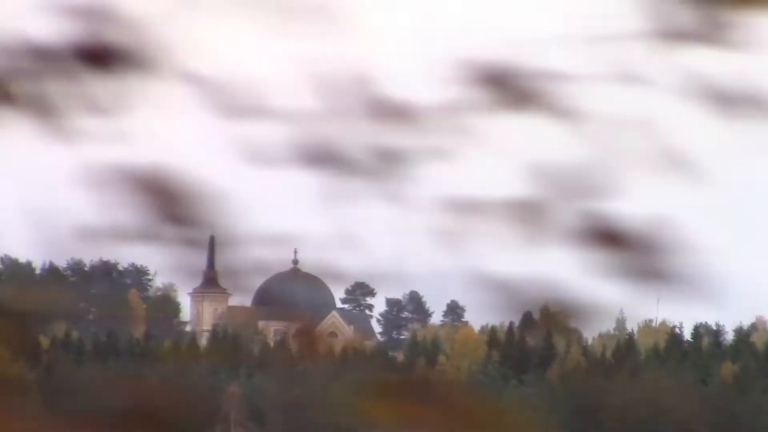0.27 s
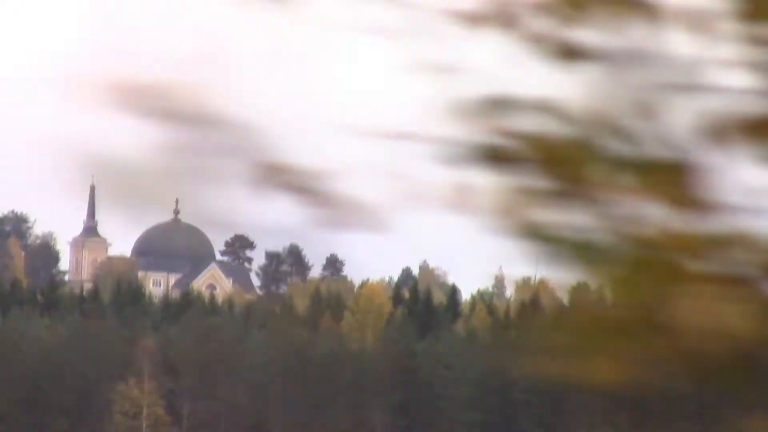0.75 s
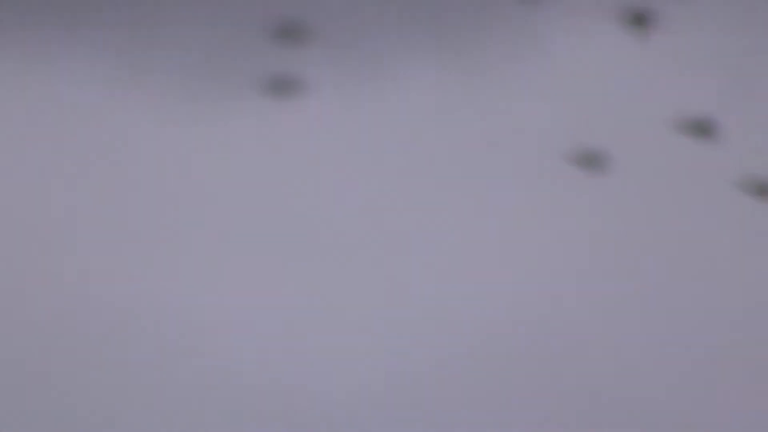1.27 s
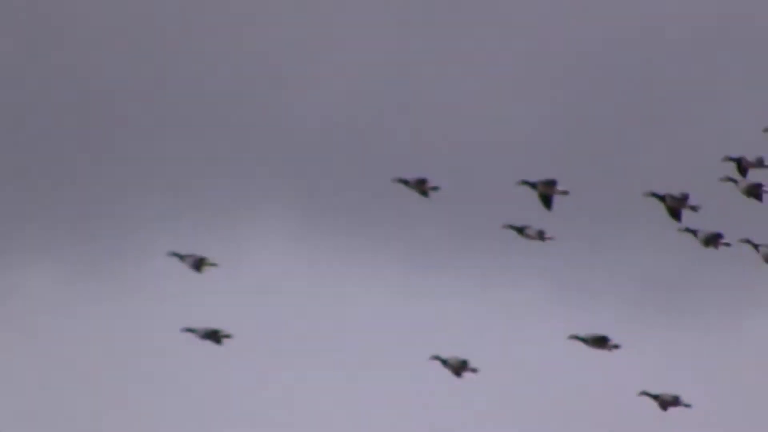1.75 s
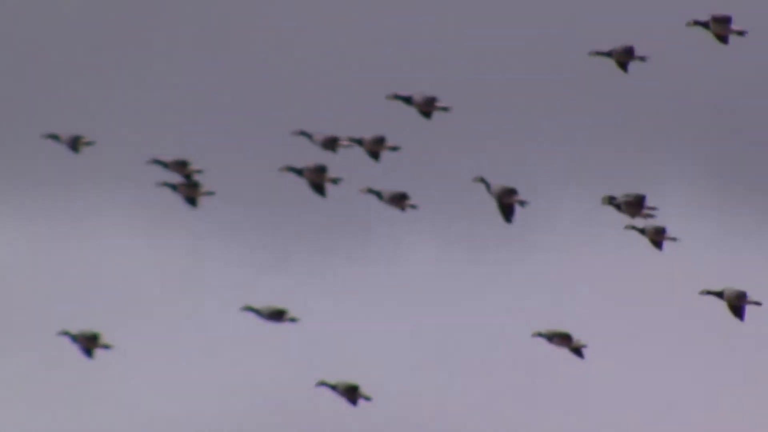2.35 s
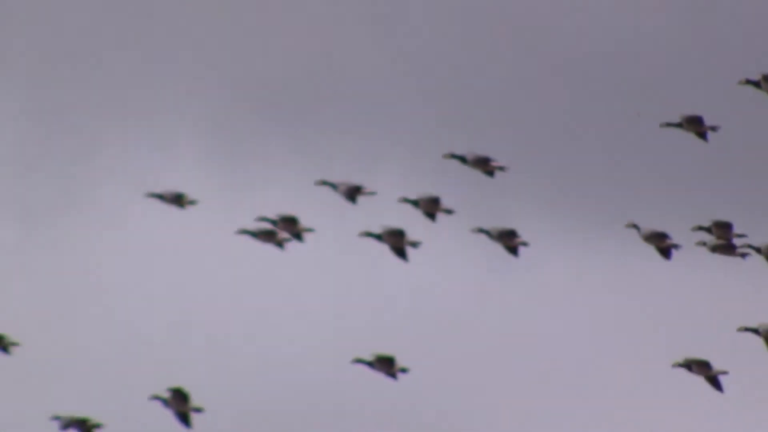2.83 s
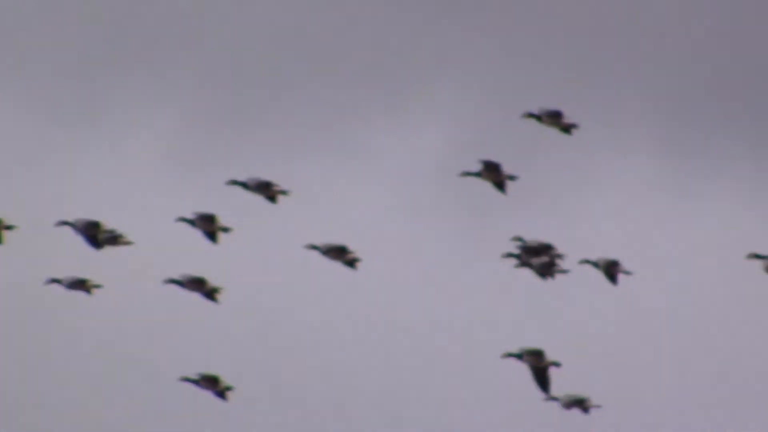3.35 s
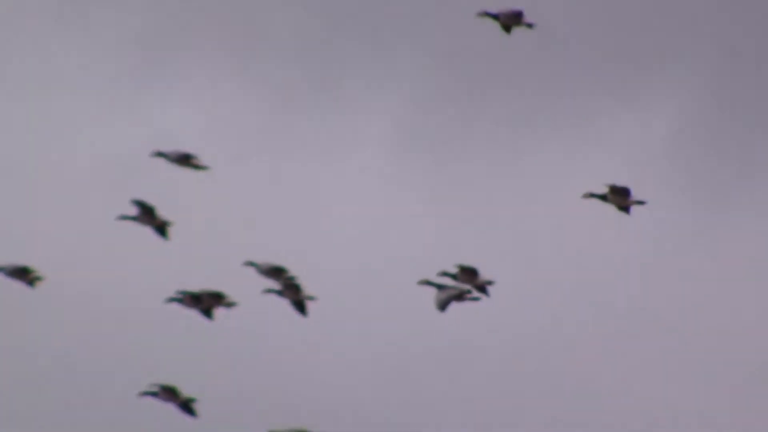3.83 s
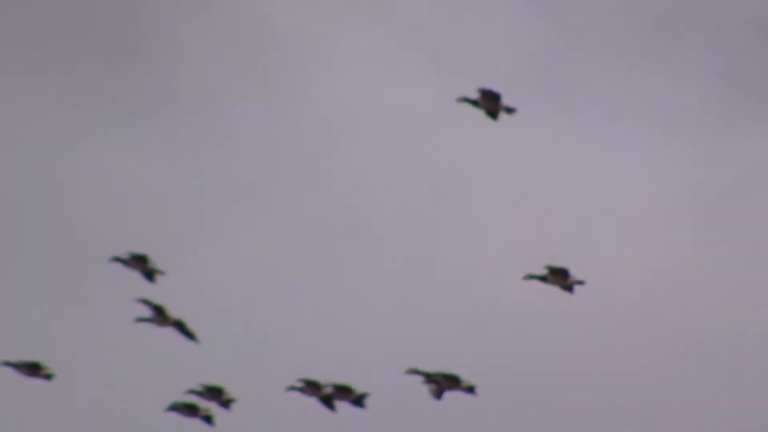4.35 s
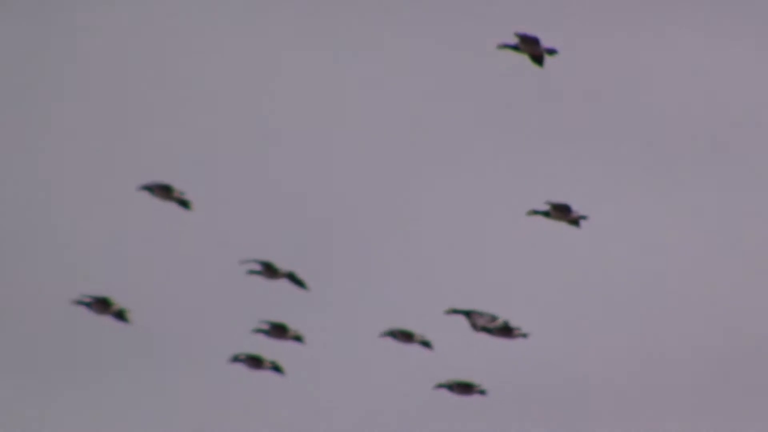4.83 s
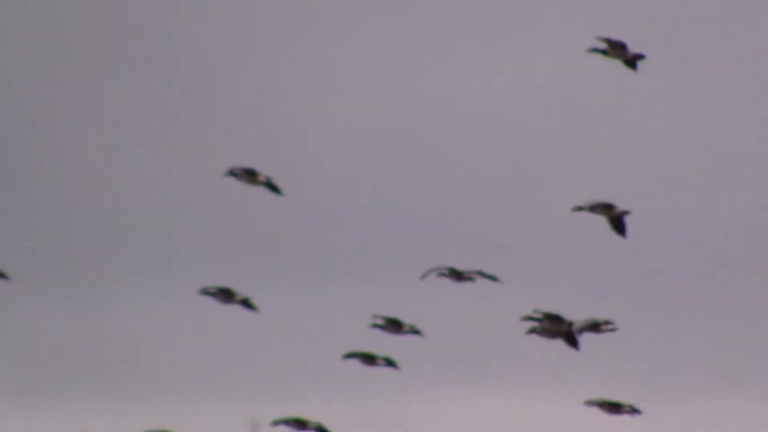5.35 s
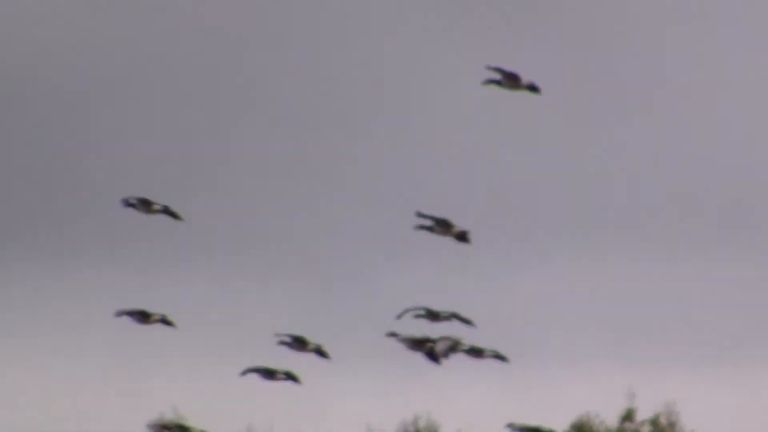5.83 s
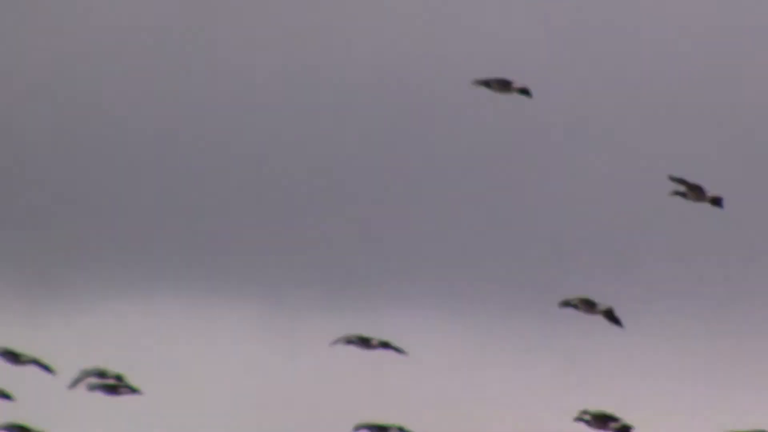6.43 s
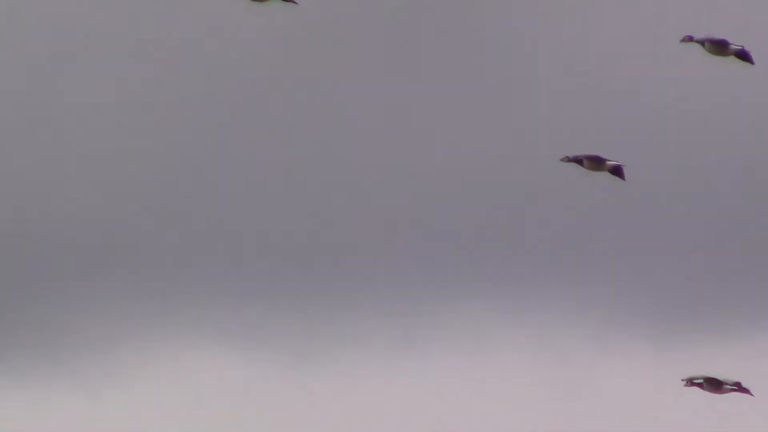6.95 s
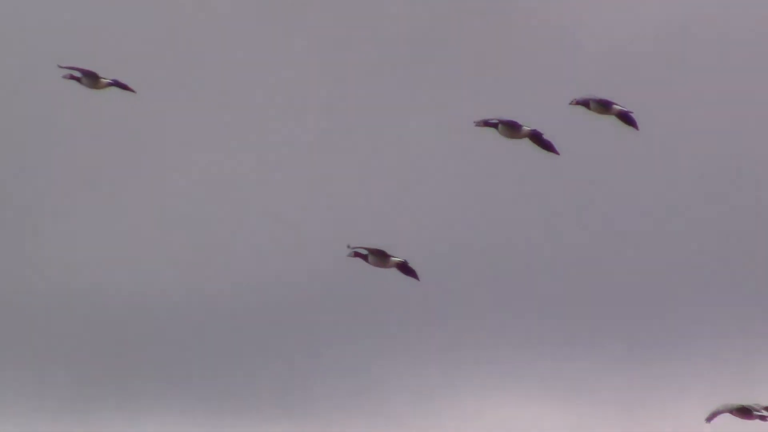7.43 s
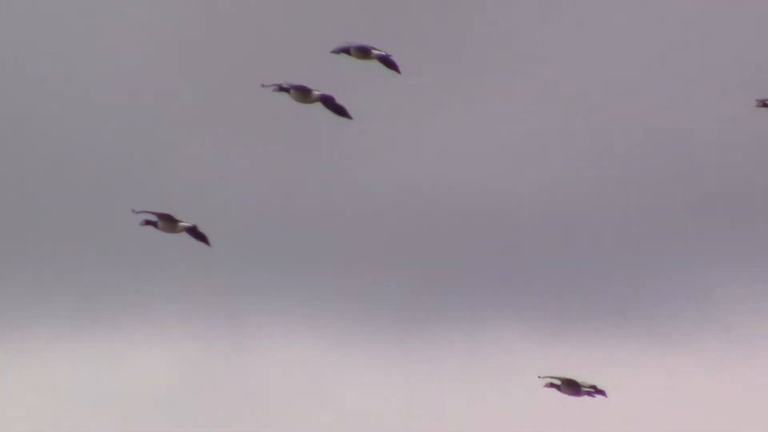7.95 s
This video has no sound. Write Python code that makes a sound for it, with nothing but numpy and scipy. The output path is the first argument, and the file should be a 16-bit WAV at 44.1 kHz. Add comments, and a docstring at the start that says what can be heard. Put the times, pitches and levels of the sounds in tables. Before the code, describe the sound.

First close, rough foliage noise with crackling twigs and handling thumps on the camera microphone. After an abrupt, near-silent break, many geese call together outdoors, blending into continuous high-pitched gabble. Individual nearer honks and yelps poke through, with soft low grunts, a quiet murmur of air and hiss underneath, and a small camera click later on. The calling continues to the end.

```python
"""Open field with a tree line: a hand-held camera brushes through bushes, then a flock of geese yaps.
Leaves and twigs are shaped noise; knocks are damped body modes over a rumble. After a near-silent gap,
near geese sing as sums of overtones, and hundreds of others blur into a chatter of filtered membrane
pulses that the tree line throws back as a decaying tail. Low grunts, a steady murmur and a few small
clicks of the camera body lie with them."""
import sys
import numpy as np
from scipy import signal
from scipy.fft import rfft, irfft, next_fast_len
from scipy.io import wavfile
from scipy.ndimage import uniform_filter1d, map_coordinates

SR = 44100
rng = np.random.default_rng(int(sys.argv[2]) if len(sys.argv) > 2 else 0)


def write(x):
    x = np.atleast_2d(x).T
    wavfile.write(sys.argv[1], SR, np.round(np.clip(x, -1, 1) * 32767).astype(np.int16))

N = 361179  # length in samples

# Transmission of windpipe and bill: f/Hz, gain/dB
VOCAL_TRACT = [(80, -62), (300, -42), (640, -23.5), (850, -9.5), (1050, -11.5), (1350, -2.5), (1550, -13),
               (1880, 0.5), (2350, -10), (3200, -20), (4500, -28), (6200, -28.5), (9000, -47.5),
               (15000, -71)]
CUT, RESUME = .8015, .833  # s: the bushes drop away, the geese start


def near_geese():
    """Additive synthesis: harmonics of an arched pitch, weighted by the resonances of windpipe and bill."""
    # Near calls: t/s, length/s, top pitch f/Hz, place of the pitch crest (share of the call),
    # nominal level of the favoured overtone/dB, open bill favours f/Hz, shrillness/dB
    yaps = [(0.851, 0.091, 895, 0.39, -39, 1840, 12), (0.95, 0.1, 809, 0.2, -48, 1650, 5),
            (1.075, 0.066, 501, 0.36, -31.5, 1970, 2), (1.132, 0.082, 441, 0.6, -46, 1760, 13.5),
            (1.226, 0.12, 870, 0.25, -32.5, 1790, -10), (1.254, 0.105, 334.7, 0.41, -42, 2390, -1),
            (1.527, 0.12, 474, 0.43, -54, 3180, -2.5), (1.705, 0.086, 439, 0.37, -32.5, 1825, -6),
            (1.901, 0.11, 459, 0.56, -38, 2300, 2.5), (1.994, 0.062, 820, 0.35, -44, 2450, -8),
            (2.123, 0.061, 432, 0.37, -36.5, 1750, 4.5), (2.207, 0.048, 1042, 0.44, -37.5, 2080, -6),
            (2.275, 0.22, 447.5, 0.48, -46, 2240.0, 4), (2.401, 0.19, 968, 0.72, -37.5, 1970, 6),
            (2.465, 0.059, 873, 0.23, -40.5, 2630, 1), (2.73, 0.091, 401, 0.52, -40.5, 2000, -2),
            (2.785, 0.06, 827, 0.47, -48, 2520, -6), (2.825, 0.073, 1020, 0.088, -51, 3060, -6),
            (3.025, 0.063, 662, 0.2, -35.5, 1330, -7), (3.069, 0.032, 897, 0.36, -46, 1850, 17),
            (3.163, 0.16, 818, 0.4, -41, 1660, 2.5), (3.269, 0.042, 960, 0.53, -31, 1920.0, 6.5),
            (3.41, 0.088, 1260, 0.59, -44.5, 1260, 12), (3.436, 0.084, 465, 0.35, -36, 1880.0, 9),
            (3.494, 0.16, 877, 0.85, -38.5, 1770, 0), (3.709, 0.1, 421, 0.6, -44, 2540, 2),
            (3.855, 0.1, 421, 0.1, -40, 2050, -10), (3.935, 0.045, 960, 0.27, -30.5, 1900.0, 5.5),
            (4.073, 0.061, 963, 0.48, -37, 1920, 10), (4.116, 0.051, 874, 0.47, -31.5, 1760, 3),
            (4.169, 0.085, 898, 0.5, -31, 1720, 1), (4.394, 0.12, 458, 0.35, -39.5, 1800, 1),
            (4.42, 0.053, 430, 0.38, -37, 1710.0, 2), (4.666, 0.068, 335.4, 0.65, -40, 1690, -1),
            (4.765, 0.079, 473, 0.18, -36, 1870.0, 2), (4.861, 0.055, 927, 0.79, -30.5, 1780, -9),
            (5.07, 0.043, 875, 0.43, -31.5, 1670, 1), (5.543, 0.051, 878, 0.32, -28.5, 1640, 0),
            (5.698, 0.067, 904, 0.97, -43, 1820, -9), (5.896, 0.048, 970, 0.15, -28.5, 1880, -7),
            (5.958, 0.33, 904, 0.084, -41, 1800, -6), (6.389, 0.13, 835, 0.55, -36.5, 1640, -6),
            (6.538, 0.27, 934, 0.12, -39.5, 1840, -1), (6.76, 0.051, 893, 0.63, -45, 1780, -4),
            (6.916, 0.064, 450, 0.7, -43, 2260, -7), (6.957, 0.095, 450, 0.41, -42, 2240.0, -9),
            (7.014, 0.077, 853, 0.58, -39.5, 1710.0, 5), (7.044, 0.18, 318.8, 0.34, -34.5, 1900, -12),
            (7.405, 0.07, 894, 0.25, -34, 1780, 2), (7.451, 0.065, 425, 0.23, -40, 1270.0, -5),
            (7.467, 0.066, 1265, 0.25, -42, 2460, 12), (7.625, 0.054, 1018, 0.26, -40, 2040, -2),
            (7.625, 0.039, 958, 0.52, -30, 1900, 1), (7.721, 0.055, 1425, 0.71, -34.5, 2930, -10),
            (7.722, 0.091, 866, 0.43, -49, 1770.0, 17), (7.878, 0.072, 309, 0.59, -30.5, 1970, 1.5),
            (7.963, 0.23, 317.8, 0.45, -35, 1900, -15), (8.104, 0.12, 840, 0.16, -35.5, 1690, -4)]
    arch, waver_share = .2, .0045  # pitch fall per squared distance from the crest; unsteadiness of pitch
    bill_db, bill_width_hz = 7.5, 190
    upper_db, upper_hz, upper_width_hz = 6, 2870, 220  # a second, higher resonance
    shrill_hz, shrill_fade_db = 2690, 3  # start of the shrill band; its loss per octave
    attack_s = .012
    out, waver = np.zeros((2, N + SR)), wobble(90)
    hoarse = amp(1.5 * wobble(180))  # unsteady level
    for s, length, top_hz, crest, db, bill_hz, shrill_db in yaps:
        at, u = round(s * SR), np.linspace(0, 1, num=int(length * SR))
        unsteady = 1 + waver_share * np.resize(waver[at:], len(u))
        pitch = top_hz * (1 - arch * (u - crest) ** 2) * unsteady
        k = np.arange(1, 10500 // top_hz + 1)[:, None]
        overtone_hz = k * top_hz
        off_bill_hz = overtone_hz - bill_hz
        scatter, phase = rng.standard_normal((2, len(k), 1))
        # the tract passes no overtone better than the bill's own frequency
        colour_db = np.minimum(along(VOCAL_TRACT, k * pitch) - along(VOCAL_TRACT, bill_hz), 0)
        colour_db += 2.1 * scatter * (abs(off_bill_hz) > top_hz / 2)
        colour_db += bill_db * (1 / (1 + (off_bill_hz / bill_width_hz) ** 2) - 1)
        faded_db = shrill_db - shrill_fade_db * np.log2(overtone_hz / shrill_hz)
        colour_db += faded_db * (overtone_hz > shrill_hz)
        colour_db += upper_db / (1 + ((overtone_hz - upper_hz) / upper_width_hz) ** 2)
        tones = amp(colour_db) * np.sin(k * 2 * np.pi * np.cumsum(pitch) / SR + phase)
        swell = np.minimum(1, u * length / attack_s) * np.minimum(1, (1 - u) / 0.14)
        call = np.sqrt(2) * amp(db) * swell * tones.sum(0)
        out[:, at:at + len(u)] += call * panned(rng.normal(-.5, 1.2))
    return out[:, :N] * hoarse


def flock(near, count=170):
    """Superposition: calls at random moments, count for each of four bird sizes, blur into a chatter."""
    # Level of the flock before it swells with near calls: t/s, level/dB
    chatter = [(.85, -32), (1.05, -39), (1.1, -32), (1.16, -36.5), (1.3, -36), (1.465, -36.5),
               (1.55, -32.5), (1.96, -34.5), (2.065, -39), (2.3, -35.5), (2.49, -31.5), (3.15, -35.5),
               (3.22, -33), (3.65, -33), (3.7, -35.5), (3.76, -33.5), (4.9, -32), (5.21, -31.5),
               (5.33, -35.5), (5.375, -31.5), (6.45, -33), (6.88, -33), (6.94, -33.5), (7.83, -33.5),
               (7.9, -34), (8.19, -33)]
    join_db, heard_db, join_s = 2, -36.5, .082  # swell, near level that stirs it, smoothing time
    evening = .33  # exponent on local power that evens out chance swings
    shriller = .7  # extra dB of the shrill band per dB of flock level
    heard = np.sqrt(np.abs(smooth(near.mean(0) ** 2, join_s)))
    level_db = curves(chatter)[0] + join_db * np.tanh(heard / amp(heard_db))
    out = np.zeros((2, 2, N))  # (plain or shrill, channel, sample)
    # (frequency stretch of the windpipe, pan dB, roughness)
    for stretch, pan_db, rough in ((.9, 1.4, .4), (.97, -2.2, .8), (1.03, .8, .5), (1.12, -1.8, 1.2)):
        calls = random_calls(count, 870 * stretch ** .5, spread=.1, length=.06)
        flaps = voices(calls, rng.random(count), .45, jitter=.018 * rough, shimmer_db=rough,
                       breath=.22 * rough)
        out += throat(flaps, stretch, split_hz=2910)[:, None] * panned(pan_db)
    out += amp(-6) * tree_line(out.mean(1), t60=.6)
    # chance swings are partly evened out, so that the waves of calling lead
    power = np.abs(uniform_filter1d(out.mean(1, keepdims=True) ** 2, size=2600) + 1e-12)
    out /= power ** evening
    body, edge = unit(out[0]), unit(out[1])
    # louder calling is shriller
    edge_db = -23 + shriller * (level_db + 33.5)
    return amp(level_db) * (body + amp(edge_db) * edge)


def grunts():
    """Source and filter: slow membrane flaps excite a chest resonance, as low, soft contact calls."""
    calls = random_calls(count=110, hz=294.4, spread=0.081, length=0.122)
    flaps = voices(calls, np.zeros(110), 0.427, jitter=0.018, shimmer_db=6.5, breath=0.24)
    # two equal band-passes at 300 Hz, each 130 Hz wide
    chest = lambda hz: (1j * hz * 130 / (300 ** 2 - hz ** 2 + 1j * hz * 130)) ** 2
    return amp(-56.5) * unit(filtered(flaps[0], chest))


def random_calls(count, hz, spread, length):
    """Random scatter of calls: (s, length s, top Hz, end Hz, relative dB, shrillness dB)."""
    sag, shrill_scatter_db = .105, 4  # typical pitch fall at the end, as a share of the top
    at, g = rng.random(count), rng.standard_normal((count, 5))
    top = hz * np.exp(spread * g[:, 0])
    end = top * (1 - sag * np.exp(.5 * g[:, 2]))
    return np.transpose([.7 + 7.5 * at, length * np.exp(0.2178 * g[:, 1]), top, end,
                         0.94 * g[:, 3], shrill_scatter_db * g[:, 4]])


def voices(calls, uneven, crest, jitter, shimmer_db, breath, bounce=0.35):
    """Pulse excitation: membrane flaps as a plain and a shrill train, with breath noise on their envelope."""
    times, sizes, shrill = [], [], []
    u = np.linspace(0, 1, num=64)
    for (s, length, top_hz, end_hz, db, shrill_db), alternate in zip(calls, uneven):
        pitch = top_hz - (top_hz - end_hz) * ((u - crest) / (1 - crest)) ** 2
        turns = np.cumsum(pitch) * length / len(u)
        k = np.arange(int(turns[-1]))
        time_chance, size_chance = rng.standard_normal((2, len(k)))
        part = np.interp(k + jitter * time_chance, turns, u)  # place of each flap within the call
        swell = np.minimum(1, part / 0.26) * np.minimum(1, (1 - part) / 0.029)
        # every other flap may be weaker, which draws lines halfway between the overtones
        size = swell * (1 + alternate * (-1.) ** k) * amp(db + shimmer_db * size_chance)
        size /= np.sqrt(top_hz * (1 + alternate ** 2))
        # an inverted bounce off the ground favours other overtones for every call
        for lag, share in ((0, 1), (rng.uniform(.0002, .001), -bounce)):
            times.append(s + part * length + lag)
            sizes.append(share * size)
            shrill.append(share * size * amp(shrill_db))
    times = np.concatenate(times)
    trains = np.array([pulses(times, np.concatenate(v)) for v in (sizes, shrill)])
    effort = np.sqrt(np.abs(uniform_filter1d(trains ** 2, size=250)))
    return trains + breath * effort * rng.standard_normal(N)


def throat(trains, stretch, split_hz):
    """Tube filtering: the windpipe colours both trains; the shrill one fills the band above the split."""
    pipe = causal([(hz * stretch, db) for hz, db in VOCAL_TRACT])
    high = lambda hz: highpass(hz, split_hz, 6)
    return filtered(trains, lambda hz: pipe(hz) * [1 - high(hz), high(hz)])


def tree_line(x, t60):
    """Diffuse reflection: convolution with decaying noise that is nearly alike in both channels."""
    t = np.arange(SR // 2) / SR
    a, b = rng.standard_normal((2, len(t))) * amp(-60 * t / t60) * (t > .015)
    tail = np.array([a + 0.051 * b, a - 0.035 * b]) / np.linalg.norm(a)
    tail = tail.reshape((1,) * (x.ndim - 1) + tail.shape)
    return signal.fftconvolve(x[..., None, :], tail, axes=-1)[..., :N]


def bushes():
    """Superposition of scraping leaves, the handled camera body and snapping twigs."""
    # Twigs and dry leaves: t/s, nominal level/dB
    snaps = [(0.0865, -19), (0.208, -11), (0.2418, -10), (0.268, -16.5), (0.2894, -22), (0.377, -10),
             (0.4125, -7), (0.4526, -18), (0.4894, -19)]
    # Spectrum of a snap: f/Hz, relative level/dB
    twig = [(900, -30), (2000, -3), (3300, 0), (4500, -16), (9000, -40)]
    return foliage() + handling() + bursts(snaps, twig, length=0.023)


def foliage():
    """Friction noise: leaves scrape past in clumps of crackle, with a slightly steadier fine hiss above."""
    # Scraping of the leaves: t/s, nominal level/dB
    rustle = [(0, -28.5), (.04, -25.5), (.175, -28.5), (.2, -25), (.25, -22), (.33, -25.5), (.415, -24.5),
              (.47, -26), (.53, -26.5), (.8, -30.5)]
    # Spectrum of the leaves: f/Hz, relative level/dB
    leaf_spectrum = [(300, -26), (600, -4.5), (1200, -0.5), (2100, 1), (3300, -0.5), (4400, -9.5),
                     (6500, -7.5), (10200, -14), (15600, -30.5)]
    fine_hz, fine_swing = 4400, .95  # start of the fine hiss; its level swing per dB of the scraping's
    crackle_db = 1.5
    leaves_db, = curves(rustle)
    hiss = rush(leaf_spectrum, [(4500, 1.0), (6800, 0.72), (15000, 0.65)])
    fine = filtered(hiss, lambda hz: highpass(hz, fine_hz, 10))
    swing_db = leaves_db - leaves_db[:round(CUT * SR)].mean()
    coarse = amp(1.5 * wobble(44.5) + crackle_db * wobble(300)) * (hiss - fine)
    # the scraping leaves rise and fall in full, the fine hiss by nearly as much
    leaves = coarse + amp((fine_swing - 1) * swing_db) * fine
    return amp(leaves_db - 0.5) * leaves


def handling():
    """Modal excitation: knocks ring the hollow camera body and stir up its rumble."""
    # Blows: t/s, peak of the envelope/dB
    blows = [(0.042, -5), (0.232, -22), (.276, -12.5), (0.427, -27), (0.587, -26), (0.593, -8),
             (0.631, -21), (.712, -19.5), (.761, -23.5), (0.774, -22.5)]
    # Modes of the camera body: f/Hz, amplitude share
    modes = [(215, 0.51), (340, 0.69), (590, 0.34), (1390, 0.17)]
    # Spectrum of the rumble: f/Hz, relative level/dB
    rumble_spectrum = [(18, -67), (30, -12), (174, 5), (506, 3), (572, -0.5), (881, -7.5), (1200, -3.5),
                       (1560, -31), (2640, -120)]
    knock_s = .018  # nominal length of a blow
    rumble_db, shake_db, shake_s = -33.5, -19.5, .043  # steady rumble; knock-stirred rumble, its spread
    rumble = rush(rumble_spectrum, [(300, 1.0)])
    knocks, rattle, t = np.zeros(N), np.zeros(N), np.arange(SR // 20) / SR
    for s, db in blows:
        # a few cycles of the body and its panels, swelling and dying fast
        ring = sum(g * np.sin(2 * np.pi * (hz * t + rng.random())) for hz, g in modes)
        u = t / knock_s * 3.3
        blow = amp(db) * u ** 3 * np.exp(3 - 3 * u)
        start = round((s - .002) * SR)
        knocks[start:][:len(t)] += blow * ring
        rattle[start:][:len(t)] += blow
    shaken = amp(rumble_db) + amp(shake_db) * np.sqrt(np.abs(smooth(rattle, shake_s)))
    body = (shaken * amp(2.5 * wobble(30.8)) + 0.22 * rattle) * rumble + knocks
    return filtered(body, lambda hz: highpass(hz, 150, 2.5))  # the microphone drops the deep bass


def bursts(events, spectrum, length):
    """Impulsive noise: short coloured puffs that decay by 60 dB in length seconds."""
    rise_s = .0015
    gate, t = np.zeros(N + SR), np.arange(SR // 20) / SR
    for s, db in events:
        gate[round(s * SR):][:len(t)] += amp(db - 2 - 60 * t / length) * (1 - np.exp(-t / rise_s))
    return gate[:N] * rush(spectrum, [(1000, 1.0)])


def field():
    """Stationary noise: low murmur of the flock, air and microphone hiss as one partly coherent bed."""
    # Spectrum of the bed: f/Hz, relative level/dB
    bed_spectrum = [(25, -47), (100, -35), (220, -20.5), (305, -22), (380, -26), (620, -24), (900, -23),
                    (3000, -33), (8000, -54), (11000, -55), (15700, -61.5)]
    # Left-right coherence of the bed: f/Hz, likeness (0 to 1)
    likeness = [(60, 0.18), (290, 0.75), (640, 0.92), (5000, 0.74), (12000, 1)]
    return amp(-48.5 + 0.4 * wobble(6.9)) * rush(bed_spectrum, likeness)


def amp(db):
    """Decibel law: level to amplitude gain."""
    return 10 ** (np.asarray(db) / 20)


def panned(pan_db):
    """Level difference between the channels: gains for left and right, pan_db apart."""
    return amp([[pan_db / 2], [-pan_db / 2]])


def unit(x):
    """Normalisation: scaled to rms 1."""
    return x / np.sqrt(np.mean(x ** 2) + 1e-20)


def along(points, hz):
    """Logarithmic frequency scale: (Hz, value) points interpolated at hz."""
    f, v = np.transpose(points)
    return np.interp(np.log(hz + 1), np.log(f + 1), v)


def curves(rows):
    """Linear interpolation: one value per sample for each column after the time."""
    s, *cols = np.transpose(rows)
    return [np.interp(np.arange(N) / SR, s, c) for c in cols]


def wobble(rate):
    """Slow random modulation: a smooth curve through rate random knots a second."""
    knots = rng.standard_normal(int(N * rate / SR) + 4)
    return map_coordinates(knots, [np.arange(N) * rate / SR])


def smooth(x, seconds):
    """Moving average, run twice for a rounded window."""
    size = max(int(seconds * SR / 2), 1)
    return uniform_filter1d(uniform_filter1d(x, size), size)


def highpass(hz, edge_hz, order):
    """High-pass gain: one half at the edge, falling below it as frequency to the order."""
    return 1 / (1 + (edge_hz / (hz + 1)) ** order)


def filtered(x, response):
    """Convolution theorem: the spectrum of x times a response of frequency."""
    m = next_fast_len(N + SR // 2)
    return irfft(rfft(x, m) * response(np.fft.rfftfreq(m, 1 / SR)), m)[..., :N]


def causal(points):
    """Minimum phase by the folded cepstrum: the given gains, ringing only after the input."""
    def response(hz):
        cep = irfft(np.log(amp(along(points, hz))), 2 * len(hz) - 2)
        cep[1:len(hz) - 1] *= 2
        cep[len(hz):] = 0
        return np.exp(rfft(cep))
    return response


def rush(spectrum, alike):
    """Coloured stereo noise of rms 1: mid and side shares set the coherence of the channels."""
    turn = lambda hz: np.arccos(np.clip(along(alike, hz), -1, 1)) / 2
    shares = lambda hz: amp(along(spectrum, hz)) * [np.cos(turn(hz)), np.sin(turn(hz))]
    mid, side = filtered(rng.standard_normal((2, N)), shares)
    return unit(np.array([mid + side, mid - side]))


def pulses(times, sizes):
    """Sampling theorem: impulses between samples drawn as windowed sincs."""
    at = times[:, None] * SR
    taps = np.floor(at) + np.arange(-7, 9)
    shape = np.sinc(taps - at) * np.cos(np.pi * (taps - at) / 16) ** 2
    index = np.clip(taps, 0, N).astype(int).ravel()
    return np.bincount(index, (sizes[:, None] * shape).ravel(), N + 1)[:N]


def scene():
    """Succession of two scenes: the rustling bushes, a short gap, then the flock."""
    # Small clicks of the camera body: t/s, nominal level/dB
    ticks = [(5.436, -27), (6.2457, -35)]
    near = near_geese()
    geese = near + amp(-22.0) * tree_line(near.mean(0), t60=0.2)
    geese += flock(near) + grunts() + field()
    geese += bursts(ticks, [(2000, -23), (3300, 8), (15000, -14)], length=0.0076)
    t = np.arange(N) / SR
    # the bushes drop by 16 dB at once, then by 2050 dB/s; the geese start hard
    fade = np.where(t < CUT, 1, amp(-16 - 2050 * (t - CUT)))
    return bushes() * fade + geese * (t > RESUME)


def record(dry):
    """Saturation and band limit: the input stage rounds off hard peaks, then a steep low-pass acts."""
    rounded = dry / (1 + np.abs(dry / .7) ** 4) ** (1 / 4)
    lowpass = signal.ellip(16, .2, 90, 15750, fs=SR, output="sos")  # order, ripple dB, stop dB, edge Hz
    return signal.sosfilt(lowpass, rounded)


dry = scene()
out = record(dry)
write(out)
```